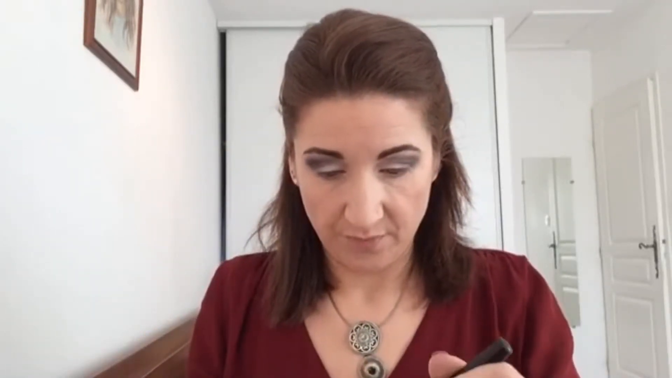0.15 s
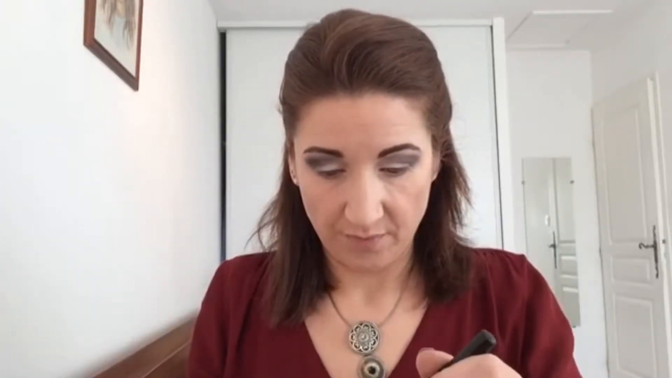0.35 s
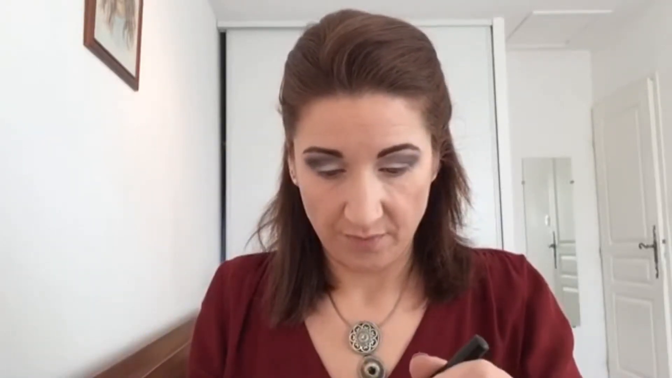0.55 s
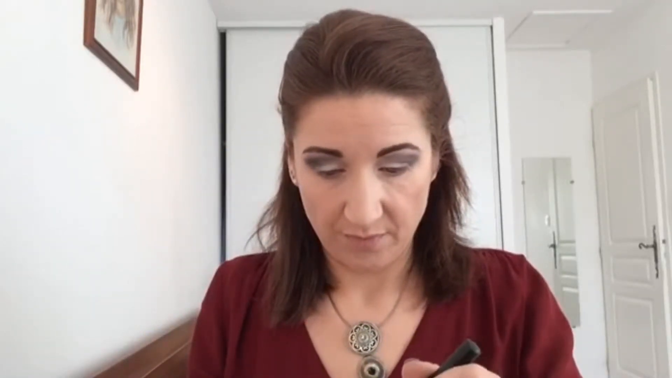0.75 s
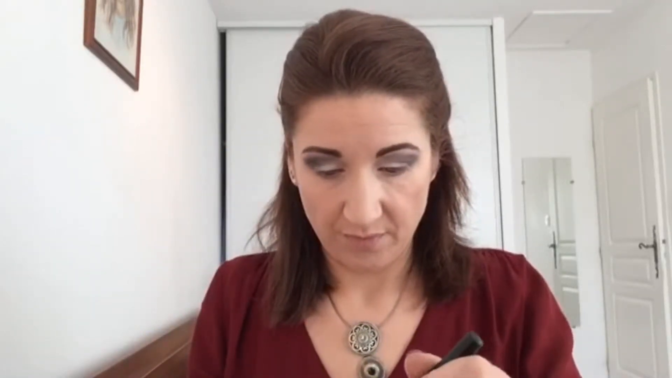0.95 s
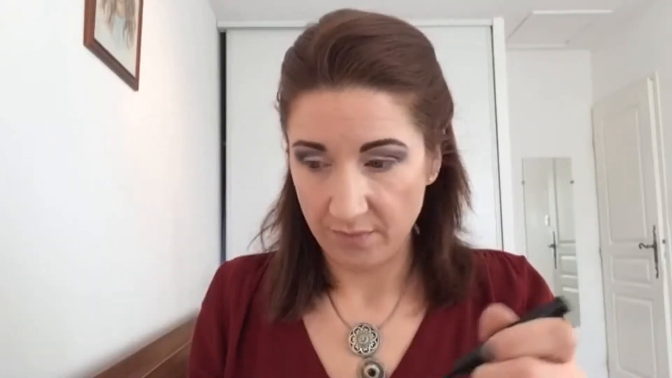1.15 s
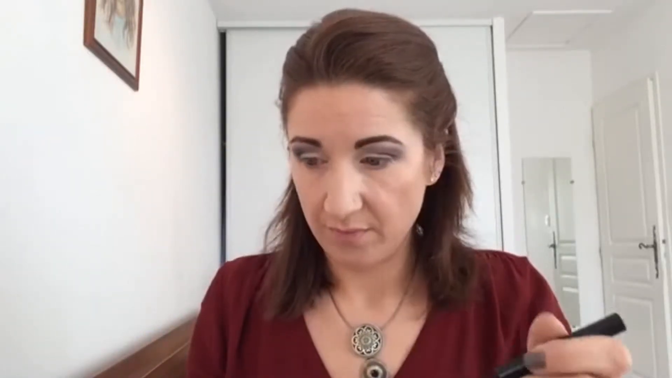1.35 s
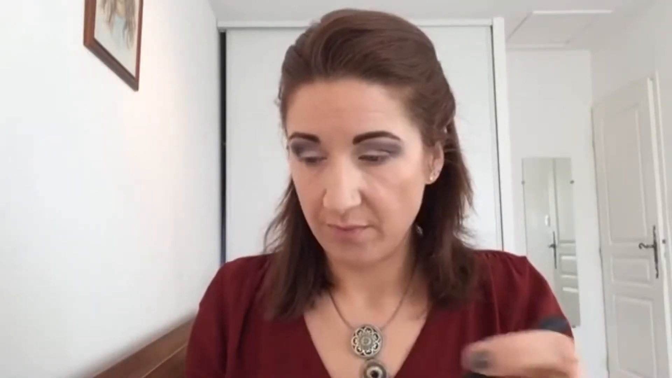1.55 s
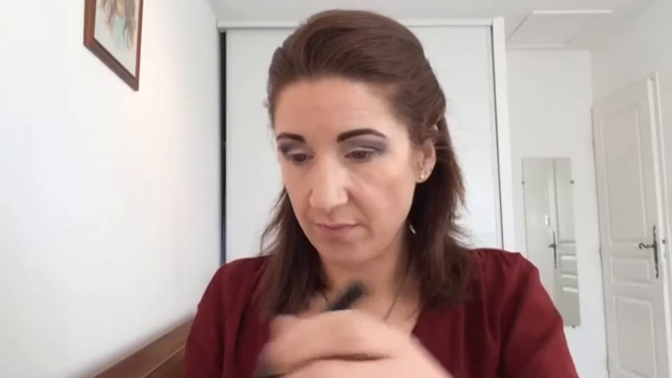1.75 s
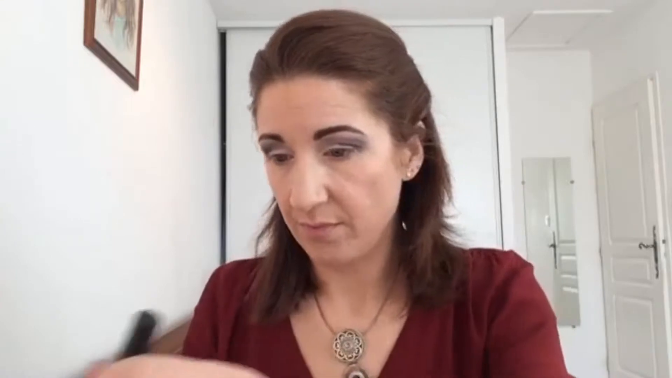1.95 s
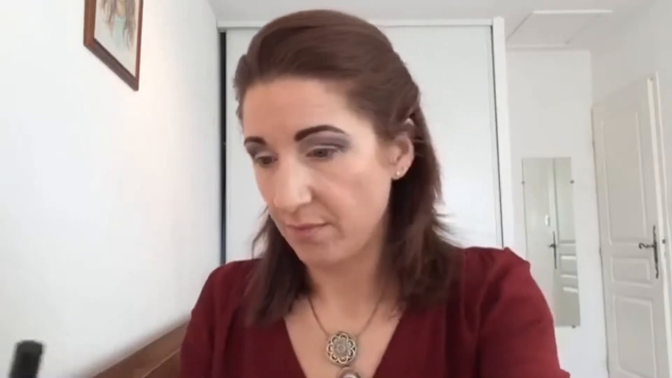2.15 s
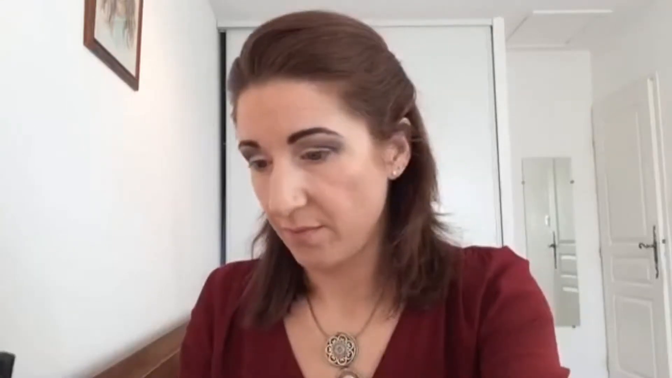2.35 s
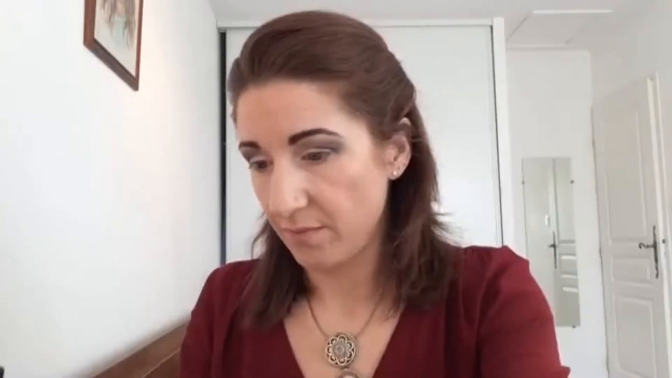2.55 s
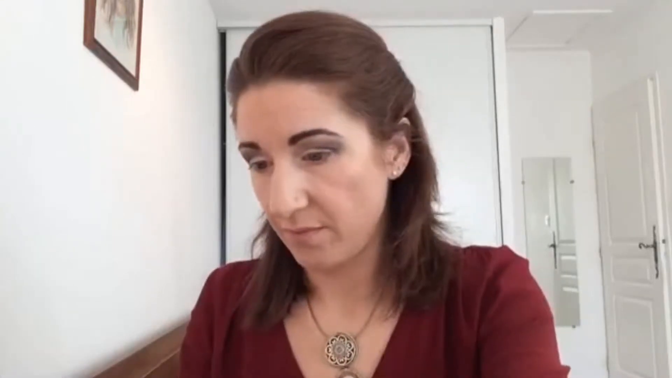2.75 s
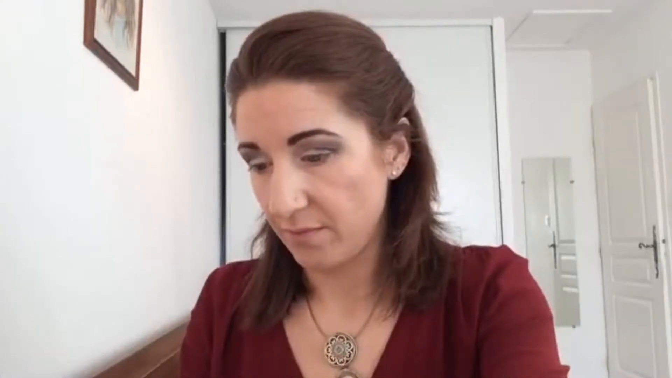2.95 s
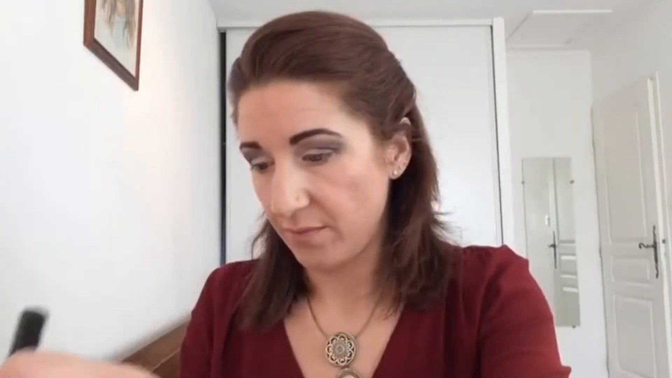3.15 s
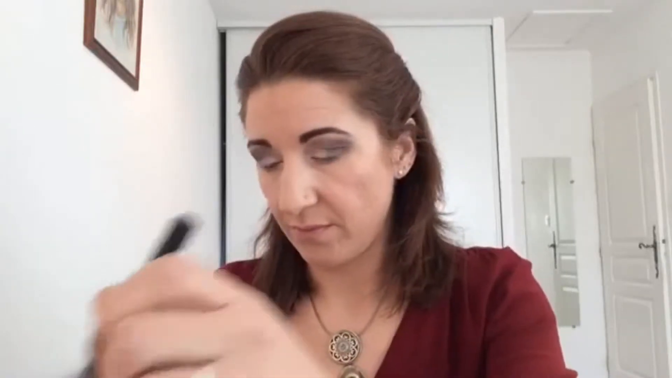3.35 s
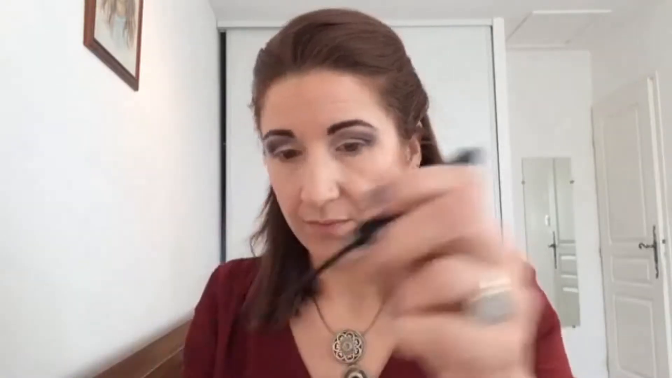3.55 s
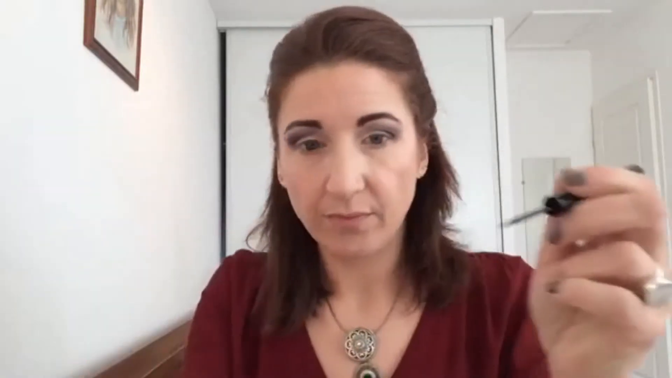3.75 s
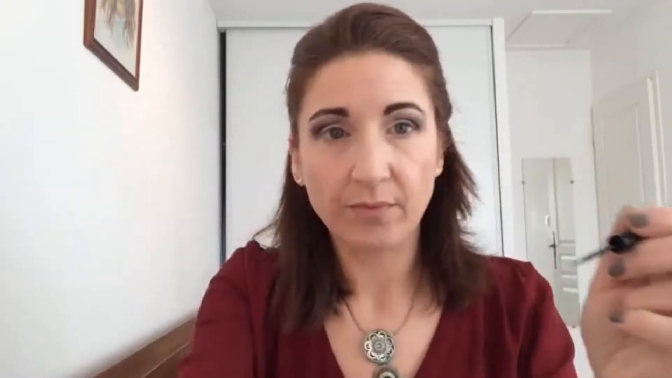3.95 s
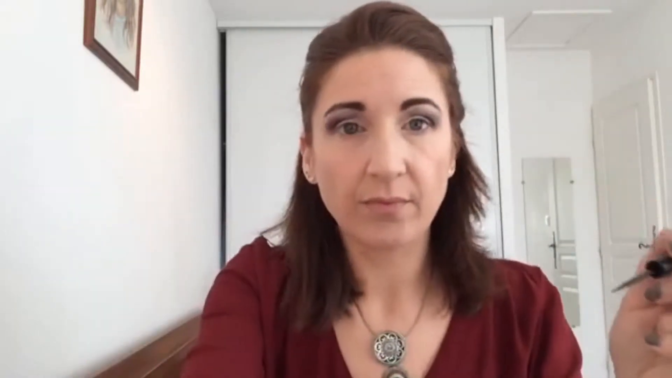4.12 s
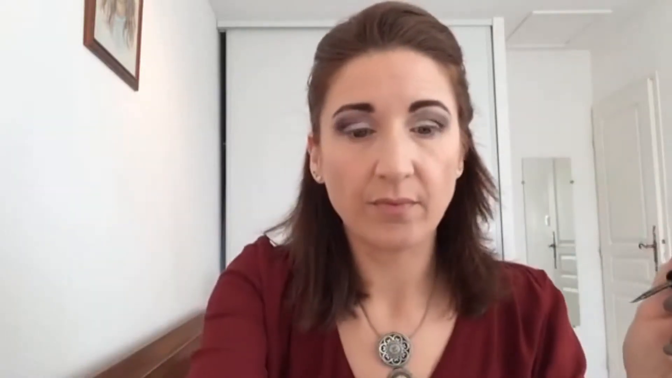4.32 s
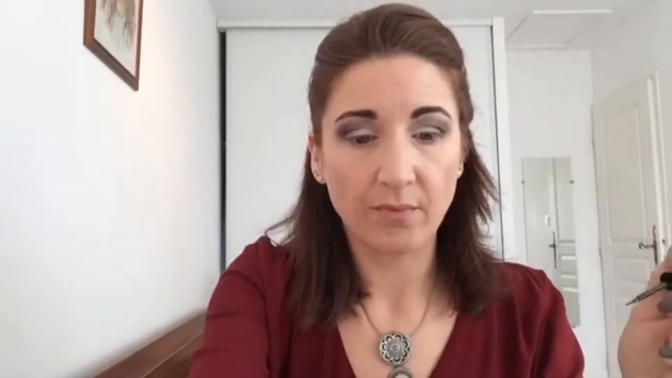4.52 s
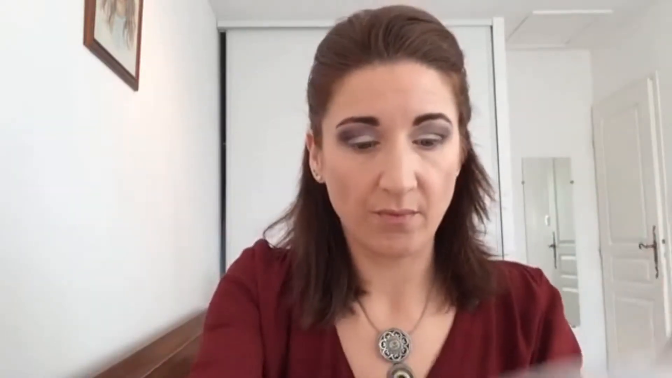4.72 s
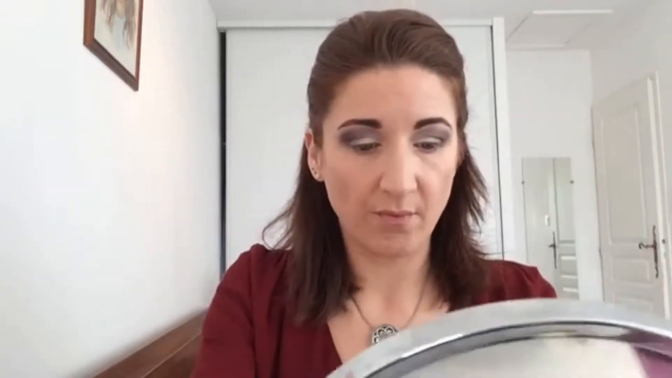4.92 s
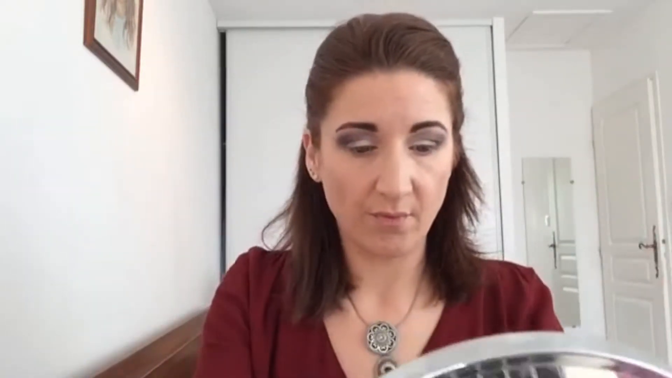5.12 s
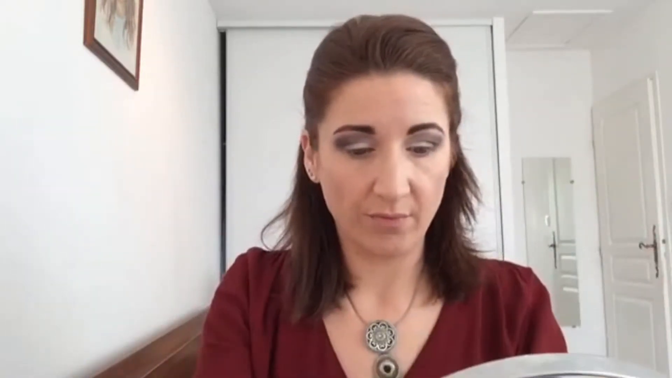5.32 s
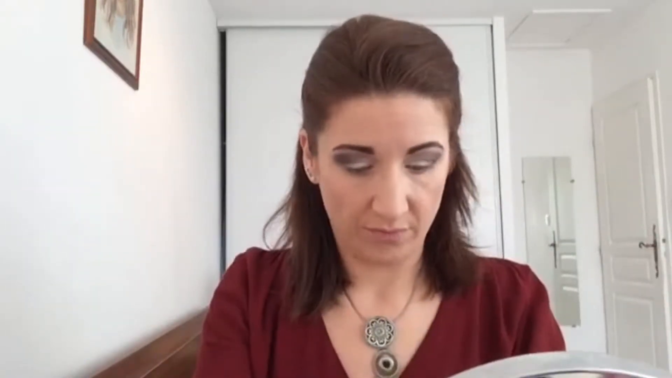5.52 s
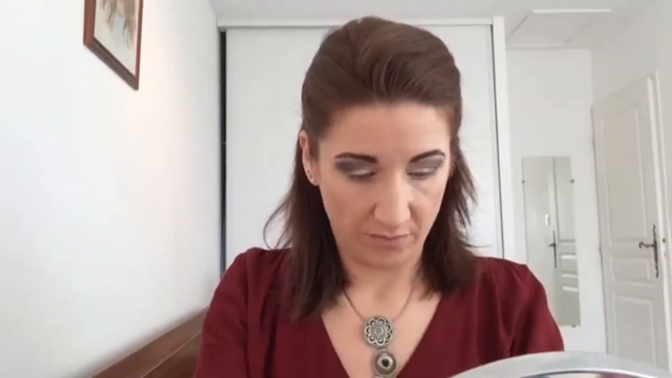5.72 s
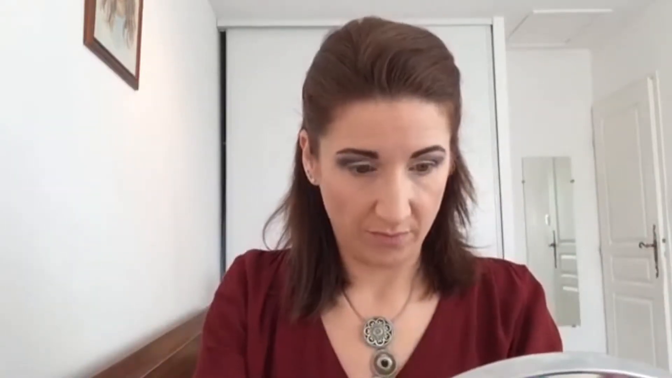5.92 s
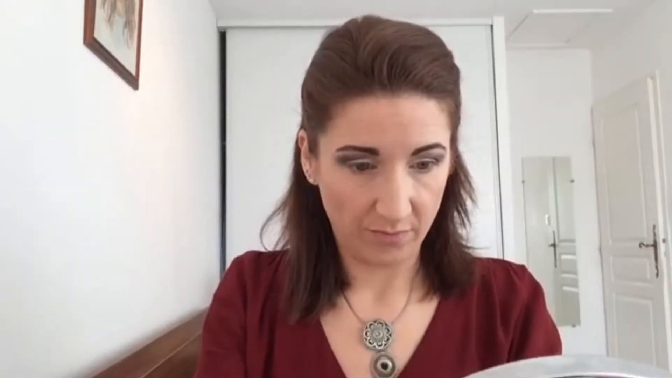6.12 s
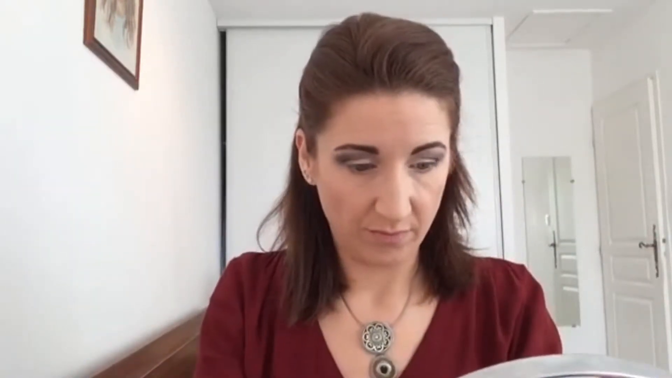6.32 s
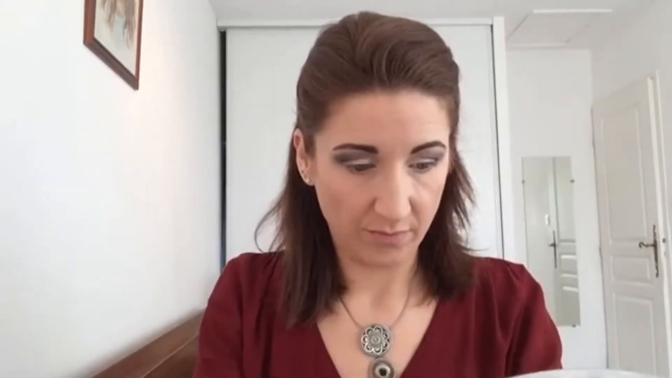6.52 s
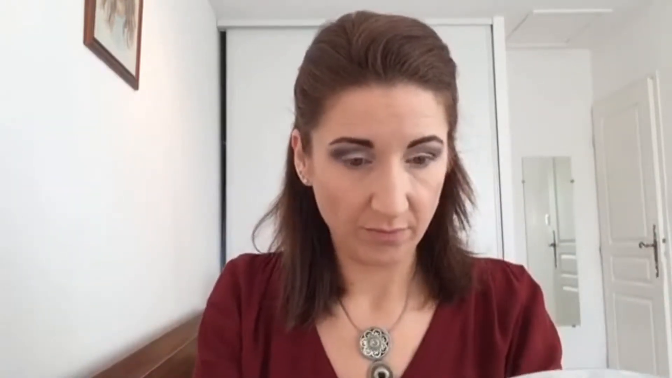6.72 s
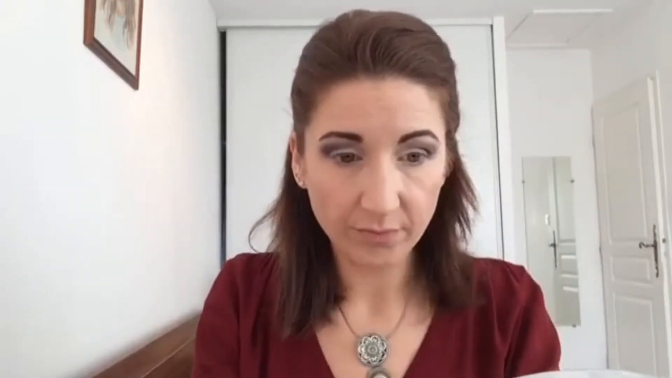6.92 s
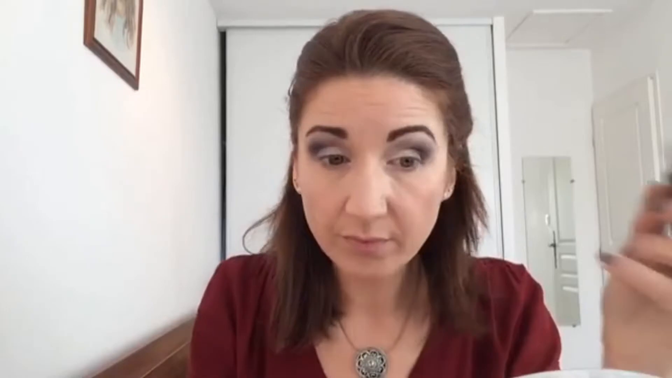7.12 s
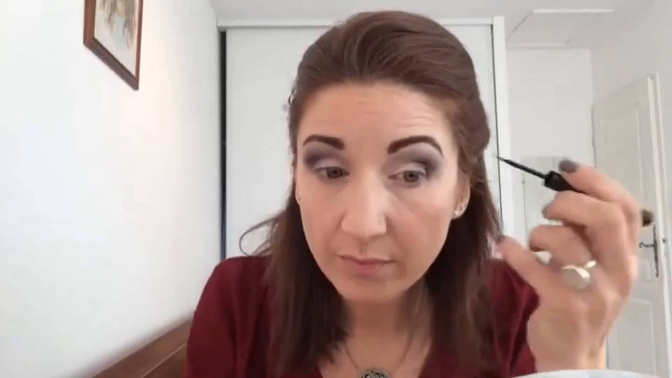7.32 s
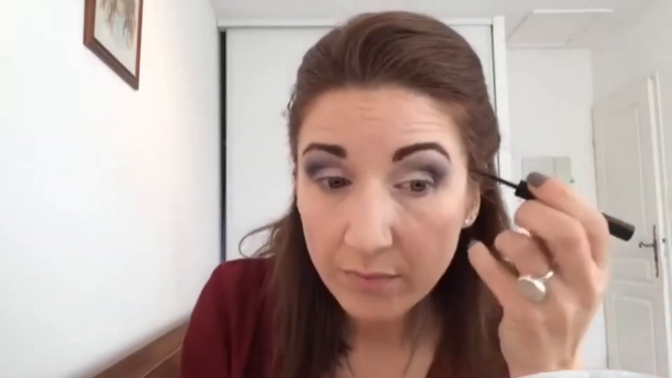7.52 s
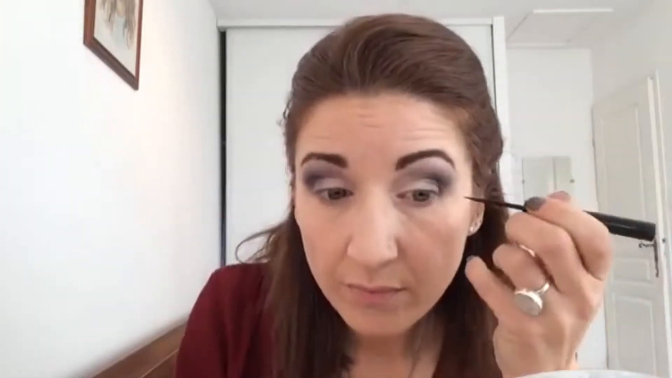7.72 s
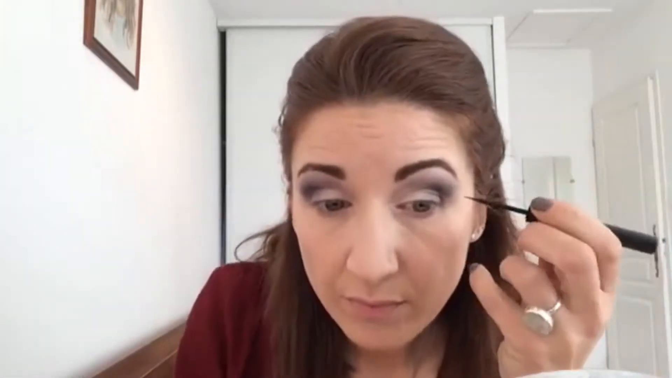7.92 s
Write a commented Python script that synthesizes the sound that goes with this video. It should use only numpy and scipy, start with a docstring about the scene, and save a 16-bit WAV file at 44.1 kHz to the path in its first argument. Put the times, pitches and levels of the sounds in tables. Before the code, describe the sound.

One sharp, loud knock rings a table top as a cosmetic tube comes down on it. Then a stand mirror slides briefly, scrapes and lands on its hollow base with a quick rattle of knocks and a low thud. Lighter plastic clicks and soft rubbing follow as it is adjusted, fading to faint arm movements. The microphone sits near the table in a small, bare room with a faint fan hum and a thin high whine.

```python
"""A faint fan and a thin electronic whine fill a small quiet room; then a tube hits a table with one hard knock.
A stand mirror is dragged closer, set down and tilted with small plastic clicks, all heard from the table.
Each contact rings the table top or the mirror's hollow base or frame, and the table thuds underneath.
Drags, arm shuffles and finger brushes are trains of tiny friction jerks. The bare walls answer."""
import sys
import numpy as np
from scipy import signal
from scipy.fft import rfft, irfft, next_fast_len
from scipy.io import wavfile

SR = 44100
rng = np.random.default_rng(int(sys.argv[2]) if len(sys.argv) > 2 else 0)


def file_out(sig):
    """Save sig as 16-bit WAV at sys.argv[1]."""
    # one column per channel
    cols = np.atleast_2d(sig).T
    # limit, then scale
    lim = np.clip(cols, -1, 1)
    pcm = np.round(lim * 32767).astype(np.int16)
    wavfile.write(sys.argv[1], SR, pcm)


N = 351429
TOP_HZ = 15850
ROOM_TONE_DB, WHINE_HZ = -66, 7540

# colour of the room tone: frequency_hz, gain_db
ROOM_TONE_EQ = [(20, -22), (35, -12), (60, -0.5), (95, -4), (170, -10.5), (420, -9.5), (580, -12),
                (950, -9), (1500, -13.5), (2300, -23), (4000, -28), (8000, -29.5), (12000, -32.5),
                (15800, -36.5)]
# fan tones: pitch_hz, level_db
FAN_TONES = [(54, -80.5), (732, -78), (878, -83), (1026, -83)]
# electronic whine: harmonic_number, level_db
WHINE_PARTIALS = [(1, -83.5), (2, -89)]
# length of the room's tail: frequency_hz, t60_s
WALL_T60 = [(120, 0.4), (450, 0.3), (1300, 0.44), (3500, 0.35), (9000, 0.27)]
# colour of the room's tail: frequency_hz, gain_db
WALL_EQ = [(60, -3), (200, -1.5), (450, -5.5), (800, -8), (1300, -14.5), (2000, -10.5), (4000, -10.5),
           (10000, -7.5)]
# colour of gritty hiss and plastic crack: frequency_hz, gain_db
GRIT_EQ = [(500, -4), (1500, 19), (2500, 9), (4500, 4), (6000, 2), (10500, -4.5), (15500, -22.5)]

# ring of the table top: pitch_hz, half_width_hz, gain_db
TABLE_MODES = [(435, 45, -5), (697, 48, -8), (1153, 150, 1), (1483, 58, -2.5), (1736, 90, -1.5),
               (2000, 81, -9), (2870, 940, -25), (3700, 520, -33), (4640, 820, -37.5), (8600, 3000, -52)]
# deep bending of the table: pitch_hz, half_width_hz, gain_db
THUD_MODES = [(120.3, 24, 5.5), (156, 38, -10.5), (241, 50, -1.5)]
# ring of the mirror's hollow base: pitch_hz, half_width_hz, gain_db
BASE_MODES = [(377, 34, -15.5), (452.6, 37, 0.5), (570, 92, -8), (797, 43, -2), (980, 110, -17.5),
              (1120, 99, 2), (1238, 22, -5), (1690, 170, -25), (1940, 200, -17), (3560, 400, -33)]
# ring of the mirror's frame: pitch_hz, half_width_hz, gain_db
FRAME_MODES = [(810, 79, 6), (970, 30, 2), (1495, 21, -9), (1730, 13.5, 18), (2220, 92, -2), (2910, 66, 2),
               (3500, 270, -3.5), (4020, 130, -8), (4870, 440, -2)]
# ring of a small hollow case: pitch_hz, half_width_hz, gain_db
CASE_MODES = [(900, 140, 4), (1750, 270, -11), (4400, 280, -16), (6200, 1200, -24), (9200, 300, -18),
              (12700, 3700, -29)]

# fingers brushing plastic: centre_s, half_length_s, level_db
FINGER_BRUSHES = [(1.24, 0.04, -78.5), (4.275, 0.035, -69), (5.05, 0.025, -74), (5.37, 0.0072, -66.5),
                  (5.485, 0.025, -70), (6.01, 0.06, -78), (6.595, 0.012, -77)]
# a hand or forearm shifting on the table: centre_s, half_length_s, level_db
ARM_SHUFFLES = [(2.02, 0.1, -66.5), (4.115, 0.02, -50.5), (5.842, 0.023, -60), (6.25, 0.04, -66),
                (6.76, 0.22, -64.5), (7.645, 0.017, -68), (7.828, 0.035, -61.5)]
# pushes of the mirror across the table: centre_s, half_length_s, level_db
MIRROR_SLIDES = [ (4.115, 0.041, -56), (4.161, 0.014, -44.5), (4.21, 0.034, -58.5), (4.268, 0.028, -48.5),
                 (5.325, 0.07, -56.5), (5.445, 0.047, -57), (5.78, 0.13, -62.5), (5.995, 0.035, -62)]
# the mirror's weight landing on one edge, then the other: start_s, level_db
MIRROR_LANDINGS = [(5.19, -34.5), (5.248, -36.5)]
# plastic parts snapping together: start_s, level_db, centre_hz
PLASTIC_CLICKS = [ (1.5872, -54.5, 8100), (4.149, -52, 11500), (4.29, -60, 9670), (5.1888, -33.5, 2230),
                  (5.2078, -45, 6900), (5.2253, -36, 3500), (5.2477, -41, 5600), (5.5033, -56.5, 9800),
                  (5.643, -43.5, 6530), (5.763, -53.5, 5900), (5.8102, -49, 6100), (6.1461, -54.5, 9100),
                  (6.148, -54, 2980)]
# knocks on the table and the mirror, the tube first: start_s, struck_body, peak_db, hardness_hz
KNOCK_CUES = [ (1.5877, "table", -7, 5000), (4.1692, "base", -35.5, 1090), (4.5245, "frame", -33.5, 2980),
              (5.1902, "base", -17, 1250), (5.2046, "base", -23.5, 1090), (5.243, "base", -28, 780),
              (5.2478, "table", -33, 1390), (5.2645, "base", -33, 1100), (5.321, "base", -35, 1050),
              (5.3838, "base", -36, 1100), (5.5035, "base", -44.5, 885), (5.6432, "base", -29, 760),
              (5.6495, "base", -32, 420), (5.7636, "base", -42, 690), (5.8107, "base", -42, 1100),
              (5.828, "base", -44, 450), (6.1467, "table", -30.5, 1600), (6.149, "base", -33, 1120),
              (6.707, "table", -53, 850), (6.812, "table", -55, 800), (6.861, "table", -48.5, 690)]


def amp(db):
    """Decibels to linear gain."""
    return 10 ** (np.asarray(db) / 20)


def unit(x):
    """Scale to rms 1."""
    return x / np.sqrt(np.mean(x ** 2) + 1e-20)


def along(points, hz):
    """Read a curve of (frequency_hz, value) points on a log frequency axis."""
    f, v = np.transpose(points)
    return np.interp(np.log(hz + 1), np.log(f + 1), v)


def filtered(x, response):
    """EQ a signal with a complex response of frequency."""
    size = next_fast_len(len(x) + SR // 4)
    return irfft(rfft(x, size) * response(np.fft.rfftfreq(size, 1 / SR)), size)[:len(x)]


def padded(x, corner_hz):
    """A padded contact passes little treble."""
    return filtered(x, lambda f: 1 / (1 + 1j * f / corner_hz) ** 2)


def add(track, start_s, sound):
    """Mix a sound into the track at its cue."""
    start = round(start_s * SR)
    track[start:start + len(sound)] += sound[:N - start]


def resonate(force, modes):
    """A force rings a body's modes."""
    size = 2 ** 14
    f = np.fft.rfftfreq(size, 1 / SR)
    gain = sum(amp(db) / (1 + ((f - hz) / half_width) ** 2) for hz, half_width, db in modes)
    gain = gain * f ** 2 / (f ** 2 + (modes[0][0] / 2) ** 2)  # little radiates below the lowest mode
    cepstrum = irfft(np.log(gain + 1e-6))[:size // 2]
    cepstrum[1:] *= 2  # minimum phase: the energy comes right at the blow
    ring = irfft(np.exp(rfft(cepstrum, size)))[:size // 2]
    return signal.fftconvolve(force, ring)[:len(force)]


def slips(per_s=2500, scatter_db=4, noise_gain=0.18):
    """Friction force of rms 1: a train of tiny uneven jerks over smooth noise."""
    jerks = (rng.random(N) < per_s / SR) * rng.choice([-1, 1], N)
    strength = amp(scatter_db * rng.standard_normal(N))
    return unit(jerks * strength + noise_gain * rng.standard_normal(N))


def grit(friction):
    """The hiss of rubbing over a fine grain, rms 1."""
    return unit(filtered(friction, lambda f: amp(along(GRIT_EQ, f))))


def stroke(centre_s, half_length_s):
    """The bell-shaped swell of one short movement, fastest at its centre."""
    return np.exp(-((np.arange(N) / SR - centre_s) / half_length_s) ** 2)


def strokes(cues, ref_db=0, grows=1):
    """The envelope of several movements; each dB of level over ref_db adds `grows` dB."""
    return sum(amp(grows * (db - ref_db)) * stroke(s, half_length) for s, half_length, db in cues)


def background(waver_db=2, drift_hz=9, jitter_hz=45):
    """The bed: steady room tone, slightly wavering fan tones and a thin electronic whine."""
    noise = lambda response: unit(filtered(rng.standard_normal(N), response))
    t = np.arange(N) / SR
    bed = amp(ROOM_TONE_DB) * noise(lambda f: amp(along(ROOM_TONE_EQ, f)))
    for hz, db in FAN_TONES:
        drift = noise(lambda f: np.exp(-(f / drift_hz) ** 2))
        bed += amp(db + waver_db * drift) * unit(np.sin(2 * np.pi * hz * t + drift))
    # the whine keeps its level while its pitch trembles
    tremble = noise(lambda f: np.exp(-(f / 60) ** 2))
    phase = 2 * np.pi * np.cumsum(WHINE_HZ + jitter_hz * tremble) / SR
    return bed + sum(amp(db) * unit(np.sin(harmonic * phase)) for harmonic, db in WHINE_PARTIALS)


def walls(send):
    """The bare walls return a diffuse tail that dies at its own speed at each frequency."""
    hz, t, spectrum = signal.stft(rng.standard_normal(SR // 2), SR, nperseg=256)
    decay = amp(-60 * t / along(WALL_T60, hz)[:, None])
    tail = signal.istft(spectrum * decay, SR, nperseg=256)[1]
    tail = np.pad(tail / np.linalg.norm(tail), (SR // 200, 0))  # 5 ms pre-delay
    return signal.fftconvolve(send, filtered(tail, lambda f: amp(along(WALL_EQ, f))))[:N]


def finger_brushes(centre_hz=10500, octaves=0.7):
    """Skin on smooth plastic gives only a thin, high rustle."""
    rustle = filtered(slips(), lambda f: np.exp(-(np.log2((f + 1) / centre_hz) / octaves) ** 2))
    return strokes(FINGER_BRUSHES) * unit(rustle)


def arm_shuffles(top_db=-6):
    """A shifting arm gives sparse padded bumps that bend the table and faintly ring its top."""
    bumps = slips(per_s=120, scatter_db=3, noise_gain=0.028)
    top = unit(padded(resonate(bumps, TABLE_MODES), corner_hz=550))
    rumble = unit(resonate(bumps, THUD_MODES))
    return strokes(ARM_SHUFFLES) * (rumble + amp(top_db) * top)


def case_nudge(level_db=-56.5):
    """A small hollow case rings as the reaching hand brushes it aside."""
    ring = unit(resonate(slips(), CASE_MODES))
    return amp(level_db) * stroke(centre_s=3.887, half_length_s=0.021) * ring


def mirror_slides(ref_db=-48, hiss_db=-52, judder_db=-64):
    """The dragged mirror's base drones, its feet hiss on the table's grain and the table judders."""
    friction = slips()
    drone = strokes(MIRROR_SLIDES) * unit(padded(resonate(friction, BASE_MODES), corner_hz=1620))
    # a faster push is brighter: the hiss outgrows the drone, the judder grows less
    hiss = strokes(MIRROR_SLIDES, ref_db, grows=1.35) * grit(friction)
    judder = strokes(MIRROR_SLIDES, ref_db, grows=0.53) * unit(resonate(friction, THUD_MODES))
    return drone + amp(hiss_db) * hiss + amp(judder_db) * judder


def frame_scrape(frame_db=-44, grit_db=-44, base_db=-56):
    """One short, gritty scrape rings the mirror's frame and, faintly, its base."""
    friction = slips()
    frame = amp(frame_db) * unit(resonate(friction, FRAME_MODES))
    base = amp(base_db) * unit(resonate(friction, BASE_MODES))
    return stroke(centre_s=4.518, half_length_s=0.013) * (frame + base + amp(grit_db) * grit(friction))


def table_sway(pitch_hz=51, t60_s=0.21, attack_s=0.014):
    """The table rocks on its legs under the mirror's weight."""
    track, t = np.zeros(N), np.arange(SR // 2) / SR
    for start_s, db in MIRROR_LANDINGS:
        envelope = amp(db - 60 * t / t60_s) * (1 - np.exp(-t / attack_s))
        add(track, start_s, envelope * np.sin(2 * np.pi * pitch_hz * t))
    return track


def plastic_click(centre_hz, t60_s=0.02, attack_s=0.00078, band_ratio=1.69, crack_gain=0.31):
    """Hard plastic parts snap together: a dense, quickly dying ring with a broad crack."""
    t = np.arange(SR // 20) / SR
    burst = rng.standard_normal(len(t)) * amp(-60 * t / t60_s) * (1 - np.exp(-t / attack_s))
    band_hz = [centre_hz / band_ratio, min(centre_hz * band_ratio, TOP_HZ)]
    ring = signal.sosfilt(signal.butter(2, band_hz, "bandpass", fs=SR, output="sos"), burst)
    click = ring + crack_gain * filtered(burst, lambda f: amp(along(GRIT_EQ, f)))
    return click / np.std(click[:SR // 300])  # rms 1 over the transient


def knock(modes, hardness_hz):
    """One contact rings a body, peak 1: the softer the contact, the duller the knock."""
    softening = signal.butter(3, hardness_hz, fs=SR, output="sos")
    force = signal.sosfilt(softening, signal.unit_impulse(SR // 3))
    ring = resonate(force, modes)
    return ring / np.abs(ring).max()


def impacts(mirror_send_db=-5.5, click_send_db=-4, ref_db=-28, thud_db=-53.5, thud_grows=0.34):
    """Knocks, clicks and the table's thud under each knock and landing: (close sound, room send)."""
    # the wide table top fills the room; the mirror is small and close by
    bodies = {"table": (TABLE_MODES, 0),
              "base": (BASE_MODES, mirror_send_db),
              "frame": (FRAME_MODES, mirror_send_db)}
    thud = knock(THUD_MODES, hardness_hz=300)
    # each hit: start_s, sound, send_db
    hits = [(start_s, amp(db - 2) * thud, 0) for start_s, db in MIRROR_LANDINGS]
    hits += [(start_s, amp(db) * plastic_click(hz), click_send_db) for start_s, db, hz in PLASTIC_CLICKS]
    for start_s, body, db, hardness_hz in KNOCK_CUES:
        modes, send_db = bodies[body]
        hits.append((start_s, amp(db) * knock(modes, hardness_hz), send_db))
        hits.append((start_s, amp(thud_db + thud_grows * (db - ref_db)) * thud, 0))
    close, send = np.zeros(N), np.zeros(N)
    for start_s, sound, send_db in hits:
        add(close, start_s, sound)
        add(send, start_s, amp(send_db) * sound)
    return close, send


def scene(rubbing_send_db=-3):
    """The mono mix: hits, rubbing, table sway and the room's tail over the background bed."""
    hits, hit_send = impacts()
    rubbing = mirror_slides() + frame_scrape() + arm_shuffles() + finger_brushes() + case_nudge()
    reverb = walls(hit_send + amp(rubbing_send_db) * rubbing)
    return (hits + rubbing + table_sway() + reverb + background())[None]


def record(dry):
    """A brick-wall high cut at TOP_HZ."""
    return np.array([filtered(channel, lambda f: f < TOP_HZ) for channel in dry])


dry = scene()
out = record(dry)
file_out(out)
```